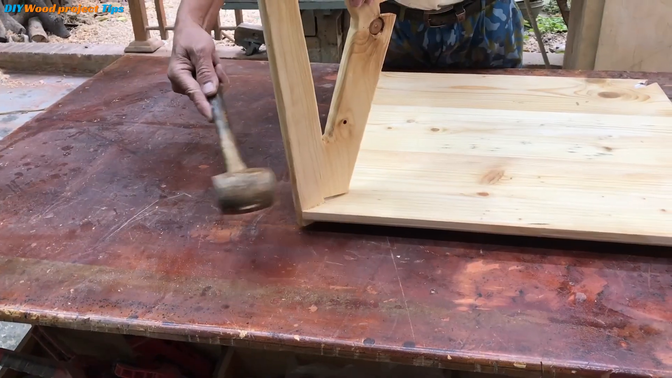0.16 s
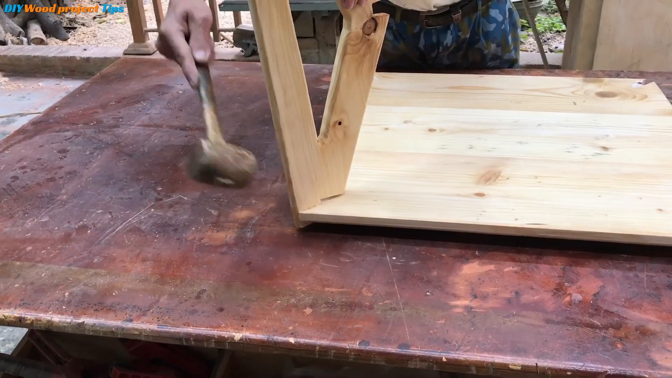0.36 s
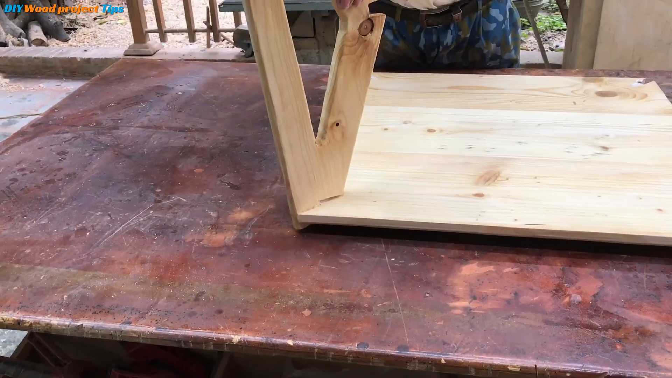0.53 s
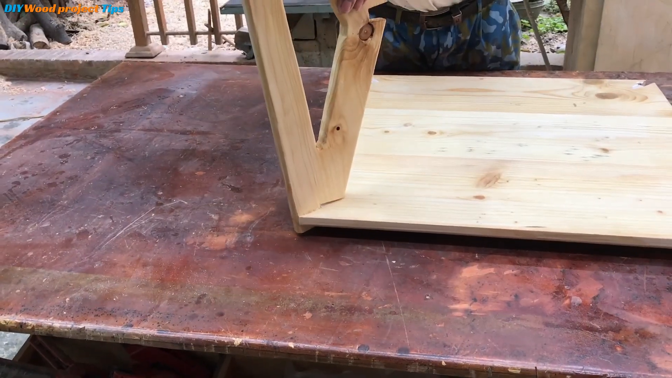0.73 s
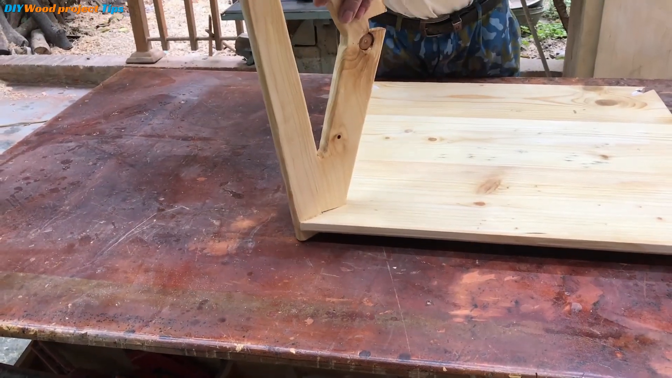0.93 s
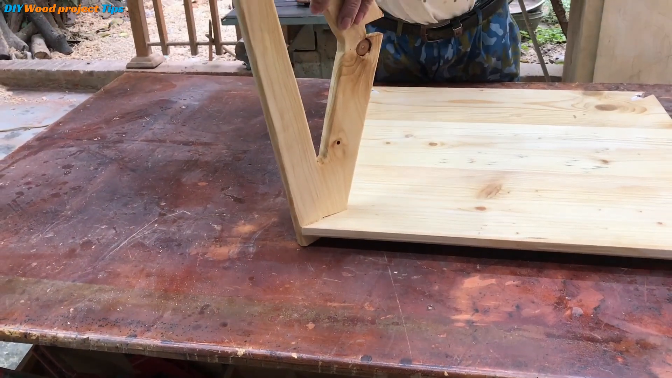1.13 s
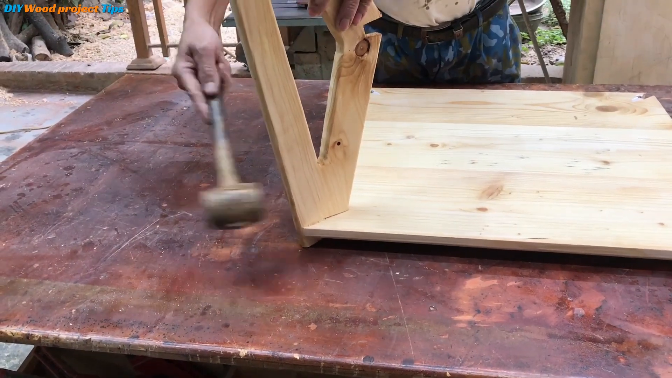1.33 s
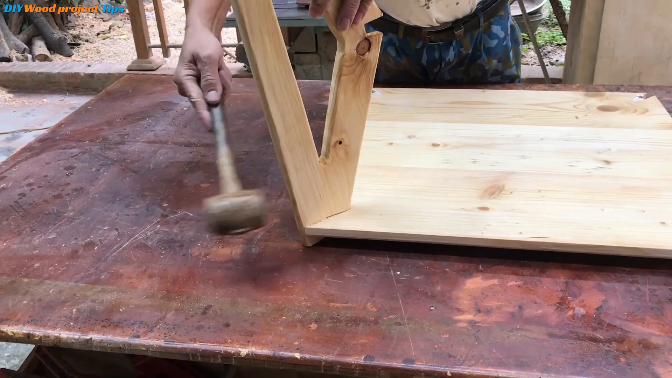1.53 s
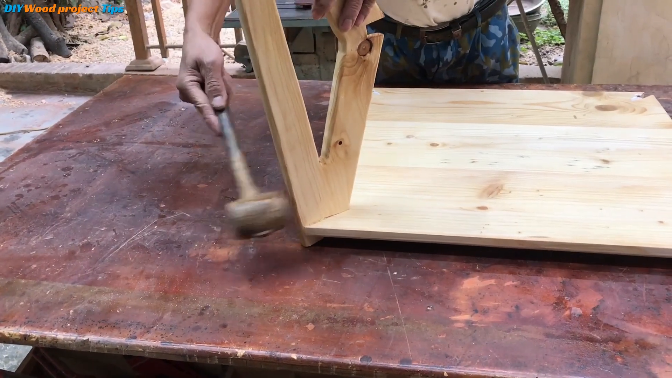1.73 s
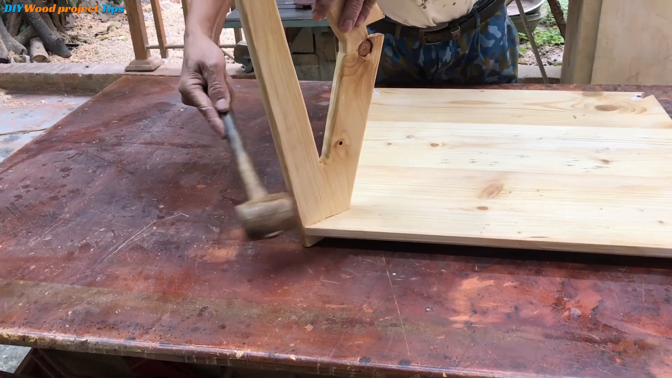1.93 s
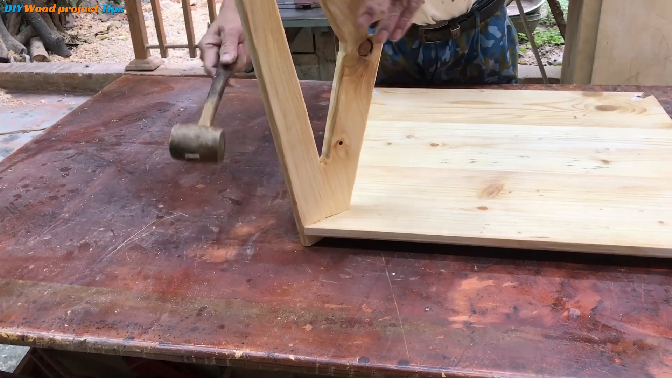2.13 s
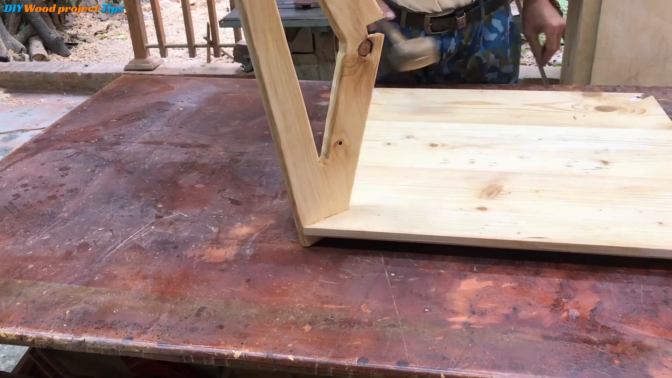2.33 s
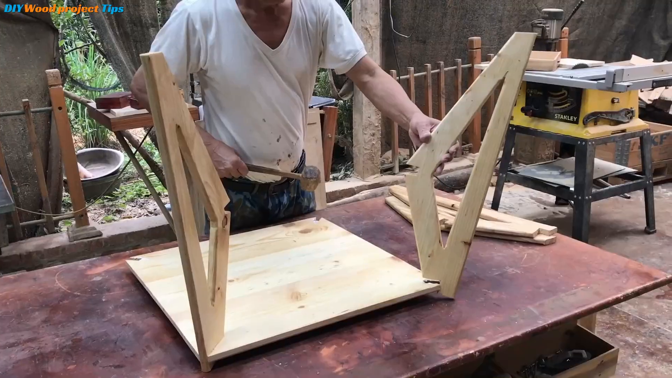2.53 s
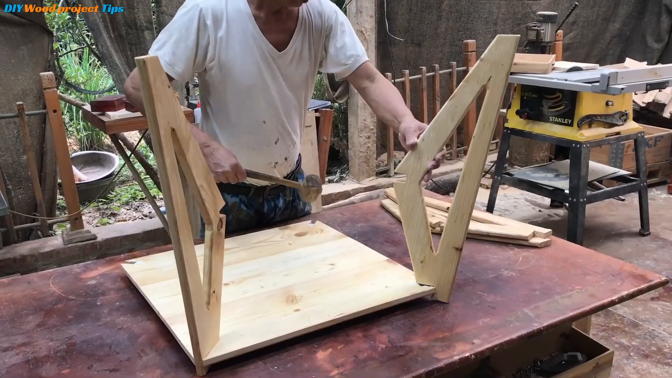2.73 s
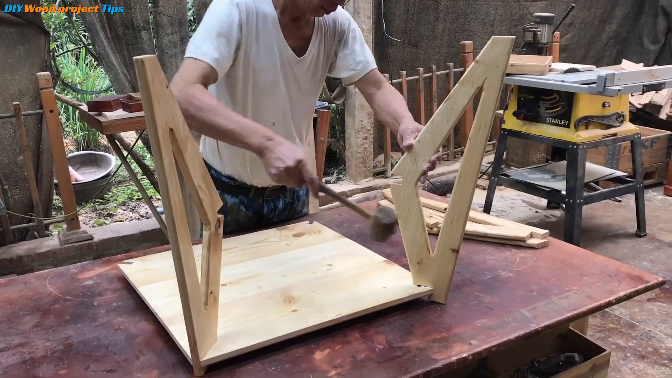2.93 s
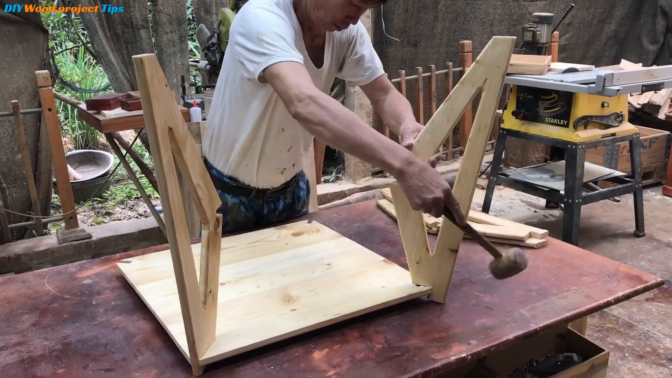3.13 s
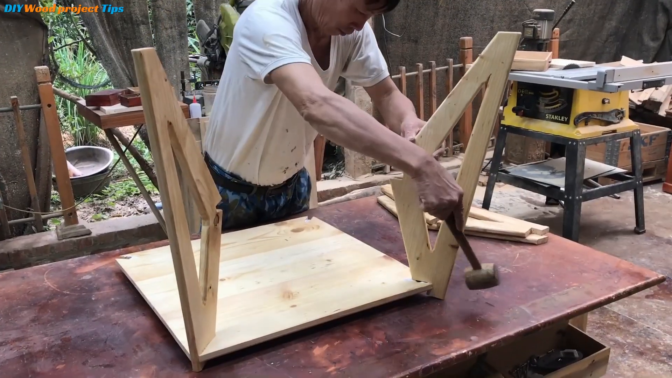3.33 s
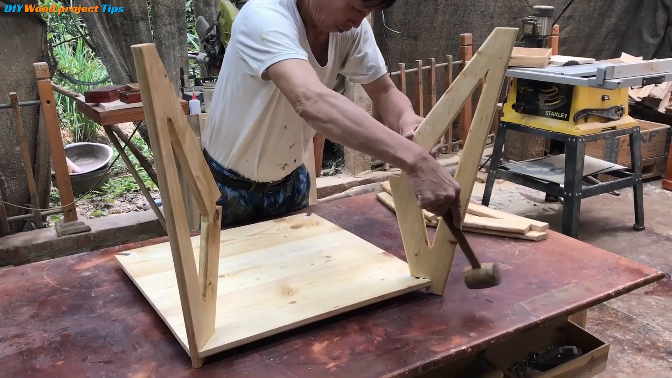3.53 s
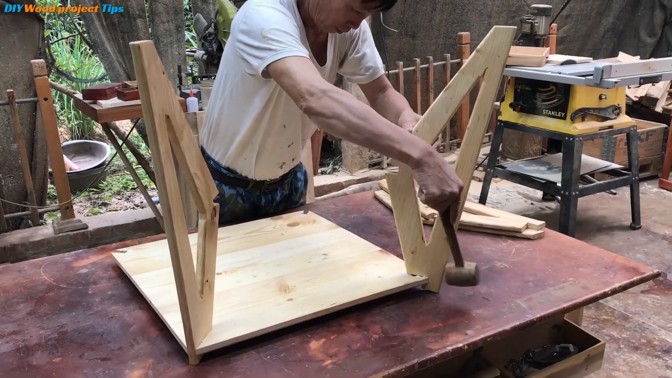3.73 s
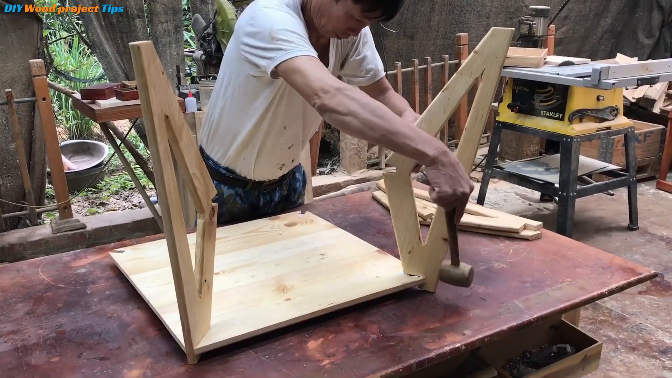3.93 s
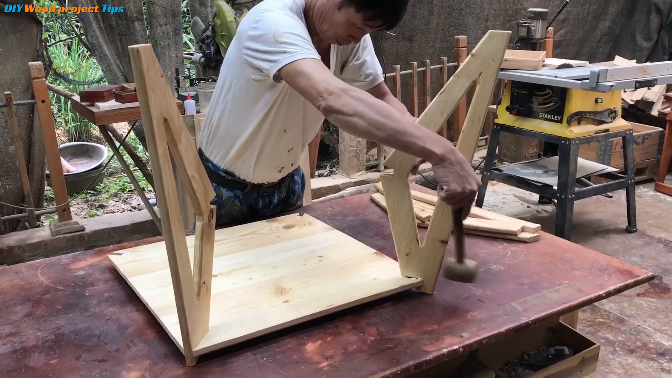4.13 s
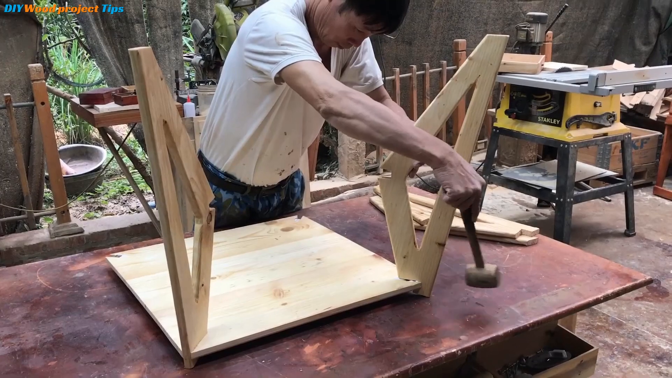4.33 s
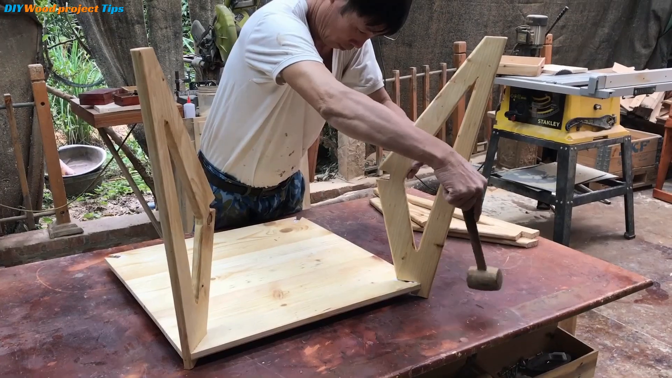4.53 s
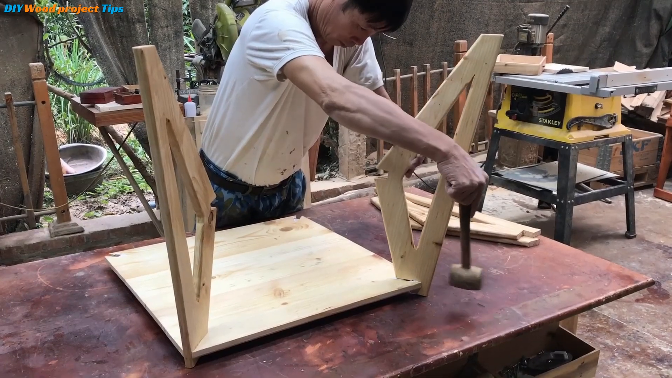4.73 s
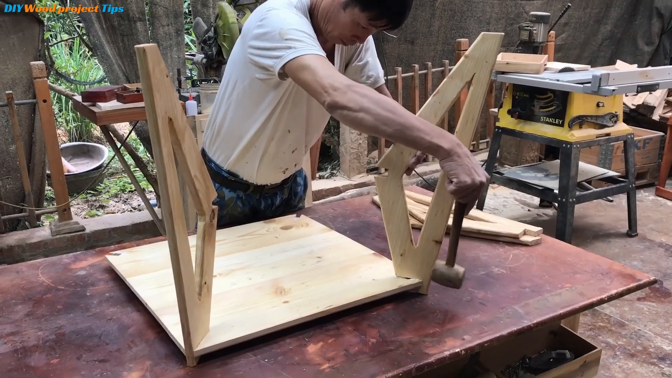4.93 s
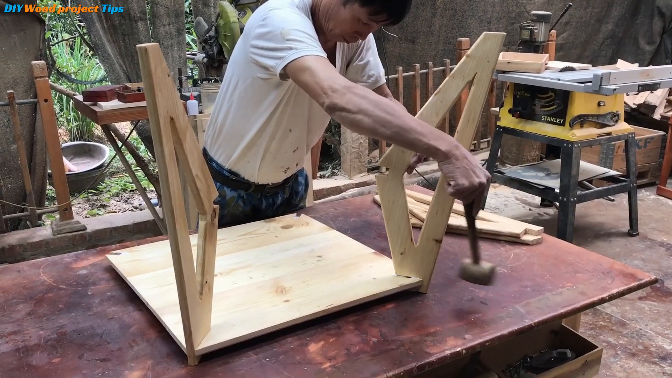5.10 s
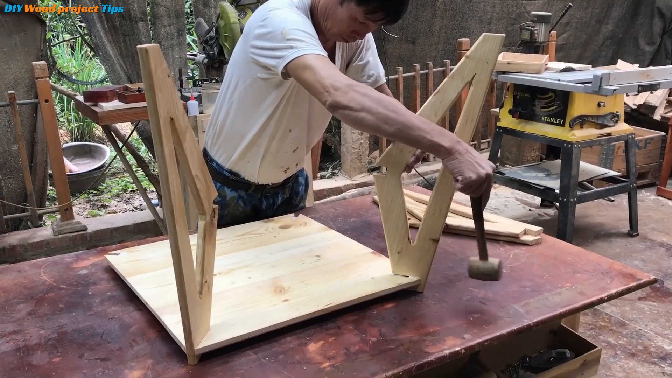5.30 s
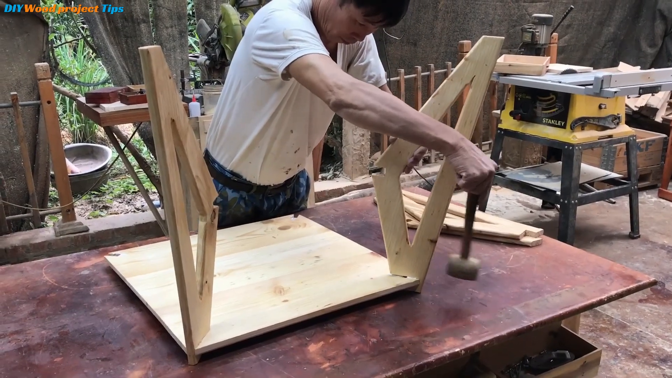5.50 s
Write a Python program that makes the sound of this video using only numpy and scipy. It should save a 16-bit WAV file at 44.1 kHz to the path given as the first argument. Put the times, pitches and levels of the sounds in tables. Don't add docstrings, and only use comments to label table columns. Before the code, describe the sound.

A wooden mallet knocks a wooden leg in very fast even runs, pauses, then drives a second joint with blows growing steadily louder.

```python
import sys
import numpy as np
from scipy import signal
from scipy.fft import rfft, irfft, next_fast_len
from scipy.io import wavfile
from scipy.ndimage import uniform_filter1d

SR = 44100
rng = np.random.default_rng(int(sys.argv[2]) if len(sys.argv) > 2 else 0)


def gain_from_db(level_db):
    decades = np.asarray(level_db, float) / 20
    return 10 ** decades


def to_wav(sig):
    pcm = np.clip(np.atleast_2d(sig), -1, 1) * 32767
    pcm = np.round(pcm).astype(np.int16)
    wavfile.write(sys.argv[1], SR, pcm.T)


N = 245187
BLOW_SAMPLES, AHEAD_SAMPLES = 6144, 1536
CUT_START_S, CUT_END_S, CUT_DB = 2.5257, 2.5472, -25


def along(table, hz):
    f, v = np.transpose(table)
    return np.interp(np.log(hz + 1), np.log(f), v)


def colour(x, table):
    n = next_fast_len(x.shape[-1], real=True)
    gain = gain_from_db(along(table, np.fft.rfftfreq(n, 1 / SR)))
    return irfft(rfft(x, n) * gain, n)[..., :x.shape[-1]]


def unit(x):
    return x / np.sqrt(np.mean(x ** 2))


def fade(t, t60):
    return np.exp(-np.log(1000) * t / t60)


def walk(rate_hz):
    k = int(SR / rate_hz)
    steps = np.repeat(rng.standard_normal(N // k + 1), k)
    return unit(uniform_filter1d(uniform_filter1d(steps, k), k)[:N])


def ring(t, modes, held_s, habit):
    quick, swell_cycles, scatter_db, detune = 0.55, 1.44, 4.0, 0.003
    after_db, late_s = -9, 0.002544
    hz, db, t60 = np.transpose(modes)[:, :, None]
    luck = rng.standard_normal((3, 24))[:, :len(modes), None]
    flutter = (.8 * habit + .6 * rng.standard_normal(habit.shape))[:, :len(modes)]
    flutter = uniform_filter1d(np.repeat(flutter, 128, axis=2), size=128, axis=2)
    flutter = flutter * np.clip(hz / 3000, 0, 1.5) * (1 - np.exp(-t / 0.0027))
    rest = gain_from_db(after_db * np.clip(hz / 2500, 0, 1.6))
    lift = rest + (1 - rest) * np.exp(-(t / held_s) ** 2)
    t = np.maximum(t - late_s * np.clip(np.log2(2600 / hz), 0, 1.1), 0)
    swell = 1 - np.exp(-t * hz / swell_cycles)
    size = gain_from_db(db + scatter_db * luck[0]) * swell * lift * fade(t, quick * np.minimum(t60, 260 / hz))
    phase = 2 * np.pi * hz * (1 + detune * luck[1]) * t + 0.39 * luck[2]
    x = np.sum(size * ((1 + flutter[0]) * np.sin(phase) + flutter[1] * np.cos(phase)), axis=0)
    return x / np.abs(x).max()


# centre_hz, level_db, t60_s, swell_s
DENSE_MODES = [(278, -27.5, 0.087, 0.012), (556, -25, 0.12, 0.022), (1212, -20, 0.079, 0.0011),
               (2850, -17.5, 0.091, 0.0015), (6530, -32.5, 0.11, 0.00043), (9700, -20, 0.083, 0.00024)]


def rattle(t, noise):
    f, spectrum = np.fft.rfftfreq(len(t), 1 / SR) + 1, rfft(noise)
    out = 0
    for hz, db, t60, swell_s in DENSE_MODES:
        band = unit(irfft(spectrum * np.exp(-np.log2(f / hz) ** 2 / 0.39)))
        out = out + band * gain_from_db(db) * (1 - np.exp(-t / swell_s)) * fade(t, t60)
    return out


BAND_EDGES_HZ = [200, 700, 1800, 4000, 8000, 15500]
# freq_hz, gain_db
SMEAR_COLOUR = [(300, 2), (1000, 5.5), (3000, -1.5), (6000, 8), (12000, 16.5)]


def blow(modes, held_s, echoes, grain, habit, bands_db):
    crack_db, first_db, contact_s, alike, smear_db = -9, 4, 0.0029, 0.73, -23.5
    t = np.arange(BLOW_SAMPLES) / SR
    f = np.fft.rfftfreq(BLOW_SAMPLES, 1 / SR)
    noise = np.sqrt(alike) * grain + np.sqrt(1 - alike) * rng.standard_normal(grain.shape)
    contact = np.exp(-(t / contact_s) ** 2) + gain_from_db(first_db) * np.exp(-t / 0.0005)
    crack = signal.lfilter([1, -.8], [1], noise[0])
    x = ring(t, modes, held_s, habit) + gain_from_db(crack_db) * contact * crack

    paths = 1
    for delay_s, db in echoes:
        duller = f * (delay_s + 0.059) / 250
        paths = paths + gain_from_db(db) * np.exp(-2j * np.pi * f * delay_s - duller)
    spectrum = rfft(x) * paths + rfft(rattle(t, noise[1]))

    tint = []
    for lo, hi, want_db in zip(BAND_EDGES_HZ, BAND_EDGES_HZ[1:], bands_db):
        peak = np.abs(irfft(spectrum * ((f > lo) & (f <= hi)))).max()
        tint.append((np.sqrt(lo * hi), want_db - np.log10(peak) * 20))
    tint = [(90, tint[0][1] - 22), (200, tint[0][1] - 3)] + tint
    cepstrum = irfft(np.log(gain_from_db(along(tint, f))))
    cepstrum[1:BLOW_SAMPLES // 2] *= 2
    cepstrum[BLOW_SAMPLES // 2 + 1:] = 0
    spectrum = spectrum * np.exp(rfft(cepstrum))

    blurred = np.sqrt(uniform_filter1d(np.abs(spectrum) ** 2, size=150)) * gain_from_db(along(SMEAR_COLOUR, f))
    before = t[AHEAD_SAMPLES:0:-1]
    smear = irfft(blurred * rfft(rng.standard_normal(BLOW_SAMPLES)))[:AHEAD_SAMPLES] / np.sqrt(AHEAD_SAMPLES)
    smear = gain_from_db(smear_db) * smear * fade(before, 0.13) / (1 + (before / .022) ** 8)
    return np.concatenate([smear, irfft(spectrum)])


# start_s, crack_db, bench_push_db, bright_db (up when
EDGE_RUN_BLOWS = [
    (-.006, -7, -27.5, 1.8),
                  (0.0981, -4.5, -31, 1.5),
    (0.1981, -2, -30, -2.8),
    (0.3012, -1.5, -31, 1.3),
    (0.398, -2, -27, -3),
]
TOUCHES = [
    (0.5087, -42, -73, 4.4),
    (0.641, -44, -79, 3),
]
SIDE_BLOWS = [
    (0.7651, -8, -23, 3),
    (0.8687, -7.5, -16.5, 4),
    (0.9748, -4, -18.5, 0.8),
    (1.0775, -4, -13.5, -2.2),
    (1.1734, -5.5, -16, -6),
]
FOOT_BLOWS = [
    (1.4669, -3.5, -37, 1.5),
    (1.5626, -1.5, -34, 1),
    (1.6652, -2, -23.5, -1),
    (1.7647, -1.5, -26.5, 4),
    (1.8721, -3.5, -24.5, 4),
    (1.9722, -3, -26.5, 2),
    (2.0661, -1, -30, -2.5),
]
LOOSE_BLOWS = [
    (3.312, -26.5, -35, -3),
    (3.406, -17, -40.5, -2),
    (3.5079, -18.5, -36, 2.1),
    (3.6098, -16, -32, 5),
    (3.718, -13.5, -31.5, 6),
    (3.8264, -11.5, -30.5, 1),
    (3.9391, -9.5, -28, -1.3),
    (4.048, -8, -29.5, -1.2),
    (4.159, -8, -28, -2),
]
TIGHT_BLOWS = [(4.264, -6.5, -30, 4.1), (4.3736, -3, -31, -2), (4.48, 0.5, -26.5, -1.5),
               (4.589, 1, -27.5, -1), (4.702, 0.5, -29, -2.5), (4.809, 1, -29, -1), (4.9197, 1.5, -32.5, 2),
               (5.0283, 2.5, -33, 1), (5.1375, 2.5, -32.5, 1), (5.2476, 3.5, -31.5, 1),
               (5.3559, 4, -32, 1.5), (5.464, 1.5, -28.5, 2.3)]
# freq_hz, level_db, t60_s
EDGE_MODES = [(349, -15.5, 0.22), (800, -39, 0.16), (1400, -1, 0.059), (1497, -11.5, 0.2),
              (2030, -22, 0.13), (2199, 0.5, 0.08), (2417, -18, 0.042), (2593, -12, 0.035),
              (2830, 2, 0.058), (3110, 0, 0.023), (3443, -2, 0.065), (3795, -11, 0.1), (5350, -8, 0.025),
              (6380, -16, 0.033)]
SIDE_MODES = [(360, 5.5, 0.045), (935, 2.5, 0.15), (1455, 14.5, 0.1), (730, -5.5, 0.12), (2440, 4, 0.051),
              (3460, 16, 0.019), (4040, 9, 0.037), (4490, -7, 0.11), (5600, -1, 0.015), (6130, 7, 0.022),
              (7220, -12, 0.12), (7195, 12.5, 0.086), (8130, 11.5, 0.42), (9200, 9.5, 0.26)]
FOOT_MODES = [(365, -1.5, 0.072), (725, -16.5, 0.1), (900, -10, 0.064), (1442, 7, 0.079), (1370, -2, 0.027),
              (2057, -2, 0.054), (2403, 6, 0.041), (2810, -22, 0.053), (3098, 1, 0.1), (3030, 1, 0.079),
              (3497, 7.5, 0.056), (3560, -11, 0.084), (5260, -13, 0.053), (5940, -44, 0.1)]
LOOSE_MODES = [(398.3, -27, 0.2), (759, -16.5, 0.1), (919, -23.5, 0.41), (1231, 1.5, 0.024),
               (1382, 1.5, 0.024), (1512, -11.5, 0.21), (1758, -8.5, 0.026), (1970, -14, 0.04),
               (2190, 3, 0.039), (2465, 4, 0.019), (2864, -1.5, 0.041), (4380, -17, 0.21), (6875, 0, 0.09),
               (7170, -3, 0.043), (8730, -4.5, 0.054)]
TIGHT_MODES = [(405, -26.5, 0.26), (910.5, -22, 0.38), (1201, -5.5, 0.1), (1536, -11, 0.3),
               (2042, -1.5, 0.027), (2203, 12, 0.018), (2370, -5.5, 0.047), (2707, 0.5, 0.043),
               (2960, -6.5, 0.052), (3241, 5.5, 0.088), (3730, -10, 0.044), (4150, -19, 0.08),
               (4590, -13, 0.24), (5600, -39, 0.1), (6686, -9.5, 0.12)]
# delay_s, level_db
FIRST_ECHOES = [
    (.003, -8),
    (.010, -22.5),
    (.017, -29),
    (.030, -23),
    (.041, -24),
]
SECOND_ECHOES = [
    (.0032, -7),
    (.0098, -6),
    (.020, -16.5),
    (0.031, -45),
    (.041, -18),
]
# knock_db, knock_db_per_crack_db, snap_db, tick_db, head_held_s
SPOTS = [
    (0, 1.1, -4, -13.5, 0.014),
    (-4, 0.45, 7, -5, 0.0047),
    (1.5, 0.65, -5, -16, 0.018),
    (0.5, 0.68, -1.5, -7.5, .004),
    (-9.5, -0.2, -8, -17.5, 0.0033),
]
BAND_TRIM_DB = [1.36, 0.1, -0.33, -0.04, 1.5]


def mallet():
    knock_per_push, knock_per_bright = 0.34, 0.2
    out = np.zeros(N + 2 * (AHEAD_SAMPLES + BLOW_SAMPLES))
    runs = [(EDGE_RUN_BLOWS + TOUCHES, EDGE_MODES, FIRST_ECHOES),
            (SIDE_BLOWS, SIDE_MODES, FIRST_ECHOES),
            (FOOT_BLOWS, FOOT_MODES, FIRST_ECHOES),
            (LOOSE_BLOWS, LOOSE_MODES, SECOND_ECHOES),
            (TIGHT_BLOWS, TIGHT_MODES, SECOND_ECHOES)]
    for (blows, modes, echoes), (knock_db, per_crack, snap_db, tick_db, held_s) in zip(runs, SPOTS):
        grain = rng.standard_normal((2, BLOW_SAMPLES))
        habit = rng.standard_normal((2, 24, 48))
        for start_s, crack_db, push_db, bright_db in blows:
            knock = knock_db + per_crack * crack_db + knock_per_push * push_db + knock_per_bright * bright_db
            snap = crack_db + snap_db + bright_db
            tick = crack_db + tick_db + bright_db
            bands_db = np.array([push_db, knock, crack_db, snap, tick]) + BAND_TRIM_DB
            i = AHEAD_SAMPLES + int((start_s + .0024) * SR)
            out[i:i + AHEAD_SAMPLES + BLOW_SAMPLES] += blow(modes, held_s, echoes, grain, habit, bands_db)
    return out, 2 * AHEAD_SAMPLES


# freq_hz, t60_s
SHED_DECAY = [(200, 0.22), (500, 0.22), (1200, 0.12), (3000, 0.17), (8000, 0.2), (15000, 0.24)]


def shed():
    tail_db = -14
    t = np.arange(16384) / SR
    tail = 0
    for hz in 140 * 2 ** np.arange(0, 7, .5):
        band = signal.butter(2, [hz / 2 ** .25, hz * 2 ** .25], "bandpass", fs=SR, output="sos")
        t60 = along(SHED_DECAY, hz)
        noise = signal.sosfilt(band, rng.standard_normal((2, len(t))))
        tail = tail + noise * fade(t, t60) / np.sqrt(t60 * SR / 14)
    tail = gain_from_db(tail_db) * tail * (1 - np.exp(-t / 0.0034))
    tail[0, 0] += 1
    tail[1, :600] += 0.097 * np.diff(rng.standard_normal(601)) * fade(t[:600], 0.02)
    return tail


# freq_hz, density_db_per_hz
YARD_SPECTRUM = [(15, -23), (25, -41), (53, -24), (84, -29), (120, 14.5), (149, -83), (223, 3), (277, -12),
                 (451, -6), (516, -44), (607, -1.5), (840, -14), (911, -14), (2480, -6), (16000, -23.5)]
# centre_hz, width_hz, level_db
HUM = [(125.6, 33, 8.5), (217.8, 3.3, 1.5), (470, 25, 3), (620, 480, 4.5), (913, 1.8, -15.5)]
# freq_hz, level_db (against the yard)
MOTOR_LINES = [(120.5, -17), (221, -4), (457.6, -17.5), (624.5, -12), (699.8, -11), (850.6, -13.5)]
# freq_hz, side_minus_mid_db
YARD_WIDTH = [(60, -19.5), (300, -1.5), (2400, 15), (15000, 0)]
# time_s, level_db
YARD_LEVEL = [(0, -52), (1.3, -53.5), (2.298, -55.5), (2.8, -53.5), (5.56, -54)]


def yard():
    far_hum_db = -4
    t = np.arange(N) / SR
    noise = unit(colour(rng.standard_normal((2, N)), YARD_SPECTRUM))
    noise = noise * gain_from_db(0.16 * walk(10.0))
    for hz, width_hz, db in HUM:
        band = signal.butter(1, [hz - width_hz / 2, hz + width_hz / 2], "bandpass", fs=SR, output="sos")
        noise = noise + gain_from_db(db - 14.5) * unit(signal.sosfilt(band, rng.standard_normal((2, N))))
    for hz, db in MOTOR_LINES:
        level = gain_from_db(db + 1.8 * walk(9.3))
        wavering_hz = hz * (1 + 0.00761 * walk(4.7))
        noise[0] += level * np.sin(2 * np.pi * np.cumsum(wavering_hz) / SR)
    bass = signal.sosfiltfilt(signal.butter(2, 160, fs=SR, output="sos"), noise)
    noise = noise - (1 - gain_from_db(far_hum_db)) * bass * (t > CUT_START_S)
    noise[1] = colour(noise[1], YARD_WIDTH)
    time_s, level_db = np.transpose(YARD_LEVEL)
    return noise * gain_from_db(np.interp(t, time_s, level_db))


def rustle():
    peak_s, level_db, rise_db_s, fall_db_s = .765, -44, 158, 600
    t = np.arange(N) / SR - peak_s
    hiss = unit(colour(rng.standard_normal(N), [(800, -32), (2500, -1.0), (7000, -5), (15000, -12)]))
    return hiss * gain_from_db(level_db + np.minimum(rise_db_s * t, -fall_db_s * t) + 2.6 * walk(48.5))


def ping():
    pitch_hz, level_db, t60_s = 2590, -45.5, 0.21
    t = np.maximum(np.arange(N) / SR - CUT_END_S, 0)
    level = gain_from_db(level_db + 1.7 * walk(42.55)) * (t > 0)
    return level * fade(t, t60_s) * np.sin(2 * np.pi * pitch_hz * t)


# ratio, level_db
PANEL_OVERTONES = [(1.31, -6), (1.65, -1.5)]


def panel():
    pitch_hz, t60_s, swell_s = 916.5, 0.11, 0.019
    level_db, per_crack, full_crack_db, per_bright = -24.5, 1.48, -5, 0.2
    t = np.arange(BLOW_SAMPLES) / SR
    hz = pitch_hz * (1 - 0.048 * np.exp(-t / 0.019))
    shape = (1 - np.exp(-t / swell_s)) ** 2 * fade(t, t60_s)
    shape = shape / shape.max()
    out = np.zeros(N + BLOW_SAMPLES)
    for (start_s, crack_db, _, bright_db), luck in zip(LOOSE_BLOWS + TIGHT_BLOWS, rng.standard_normal((24, 2))):
        phase = 2 * np.pi * np.cumsum(hz * (1 + 0.0061 * luck[0])) / SR + luck[1]
        tone = np.sin(phase)
        for ratio, db in PANEL_OVERTONES:
            tone = tone + gain_from_db(db) * fade(t, 0.38) * np.sin(ratio * phase)
        gain = gain_from_db(level_db + per_crack * min(crack_db, full_crack_db) + per_bright * bright_db)
        i = int(start_s * SR)
        out[i:i + BLOW_SAMPLES] += gain * shape * tone
    return out[:N]


# freq_hz, side_minus_mid_db
WIDTH = [(60, -1), (250, -13.5), (700, -20), (2400, -40.5), (4400, -18.5), (8000, -15), (15000, -11.5)]
# freq_hz, left_minus_right_db
LEAN = [(100, -.4), (1000, -.6), (5000, -1.1), (12000, -.7)]


def scene():
    dry, lead = mallet()
    mid, side = signal.fftconvolve(dry[None], shed(), axes=1)[:, lead:lead + N]
    back = yard()
    mid = mid + panel() + back[0] + ping() + rustle()
    side = colour(side, WIDTH) * gain_from_db(3.5) + back[1]
    lean = np.array(LEAN) * [1, .5]
    return np.array([colour(mid + side, lean), colour(mid - side, lean * [1, -1])])


def low_pass(x):
    return signal.sosfilt(signal.butter(12, 16790, fs=SR, output="sos"), x)


def record(dry):
    mono_below_db, knee_db = -35, 2.5
    t = np.arange(N) / SR
    gap = np.where((t > CUT_START_S) & (t < CUT_END_S), gain_from_db(CUT_DB), 1.)
    gap = uniform_filter1d(gap, size=20)
    mid, side = (dry[0] + dry[1]) / 2, (dry[0] - dry[1]) / 2
    loud_db = 10 * np.log10(uniform_filter1d(mid ** 2, size=1024) + 1e-12)
    side = side / (1 + np.exp((mono_below_db - loud_db) / knee_db) ** 2)
    stereo = np.array([mid + side, mid - side])
    x = np.tanh(.9 * stereo * gap) / .9
    x = signal.sosfilt(signal.butter(2, 60, "highpass", fs=SR, output="sos"), x)
    x = signal.sosfilt(signal.ellip(6, .2, 35, 15800, fs=SR, output="sos"), x)
    return low_pass(np.clip(x, -1, 1))


dry = scene()
out = record(dry)
to_wav(out)
```